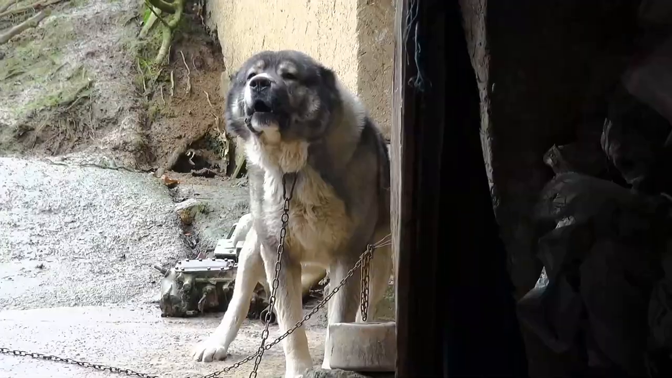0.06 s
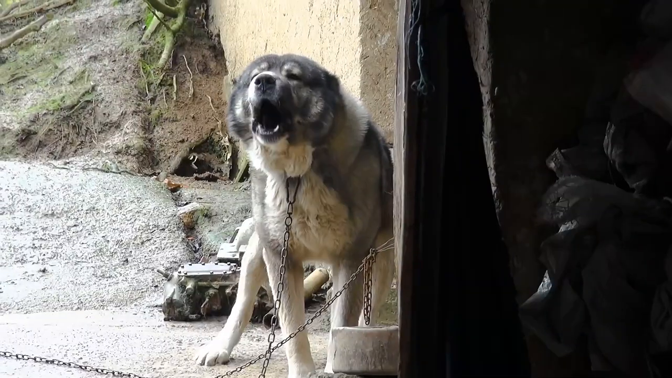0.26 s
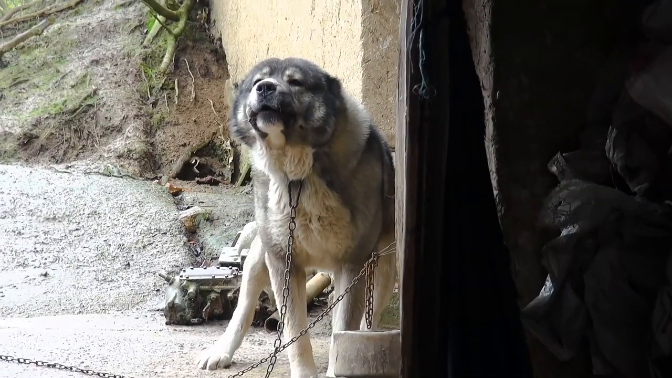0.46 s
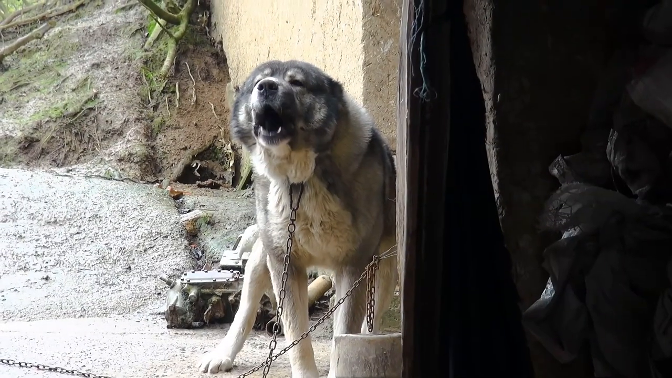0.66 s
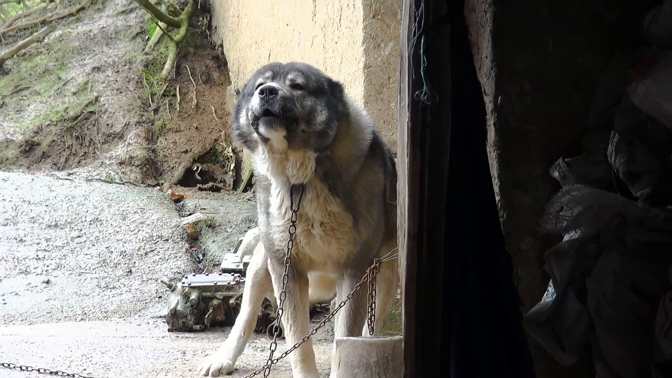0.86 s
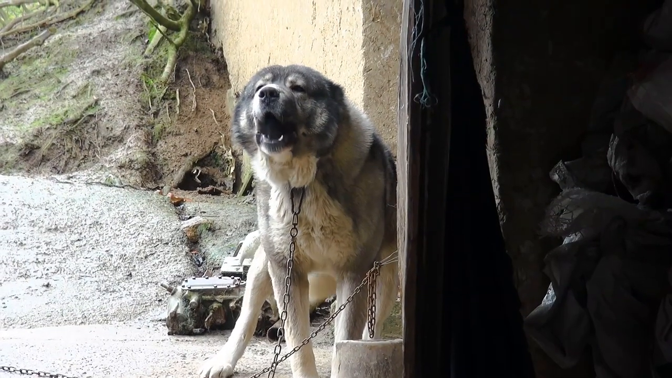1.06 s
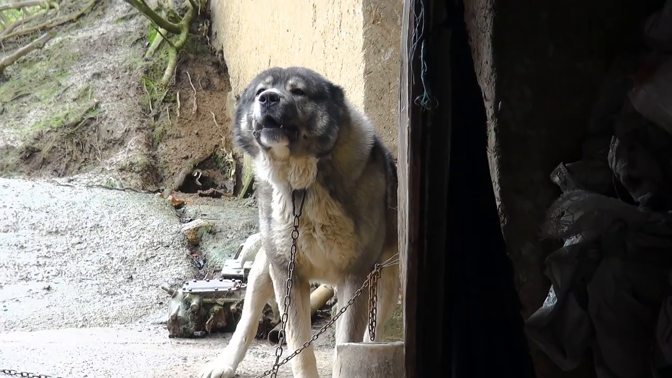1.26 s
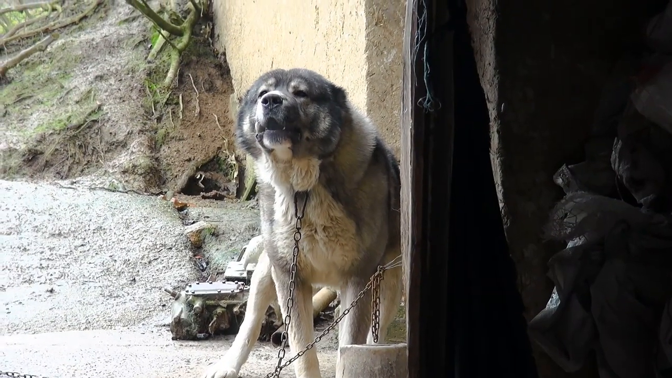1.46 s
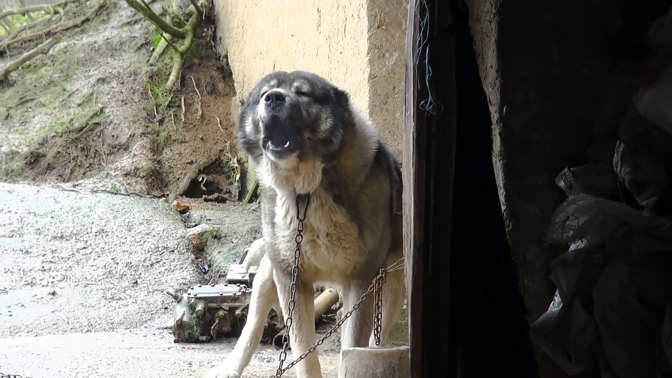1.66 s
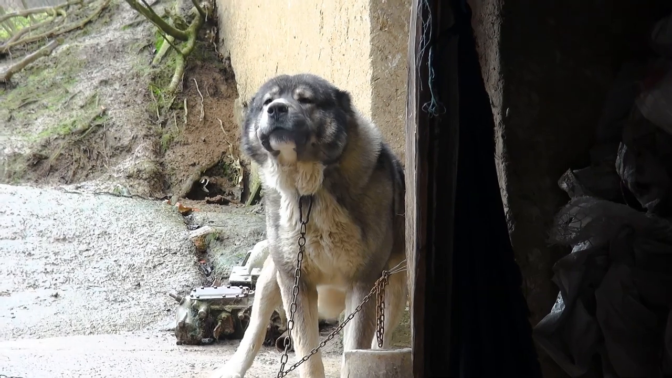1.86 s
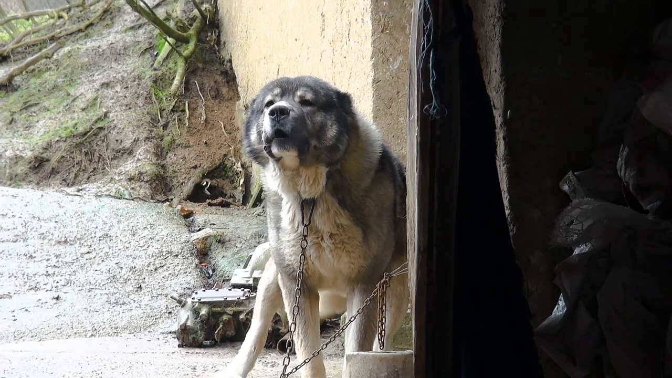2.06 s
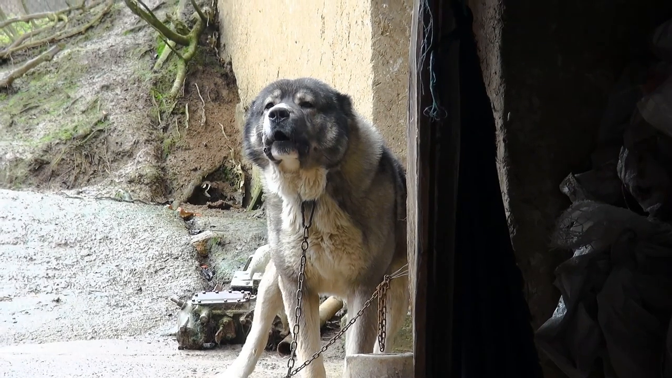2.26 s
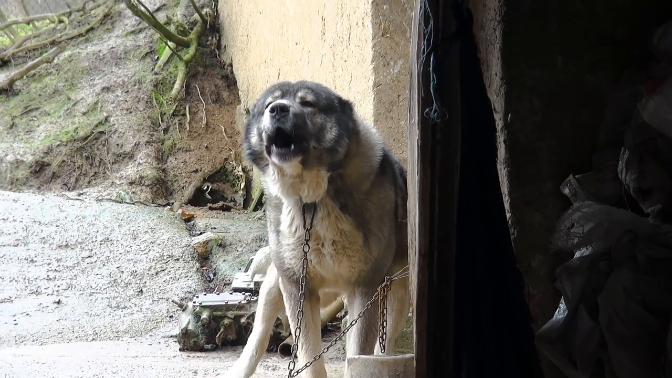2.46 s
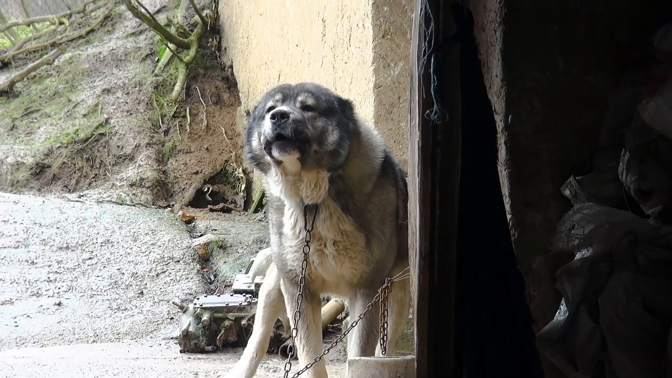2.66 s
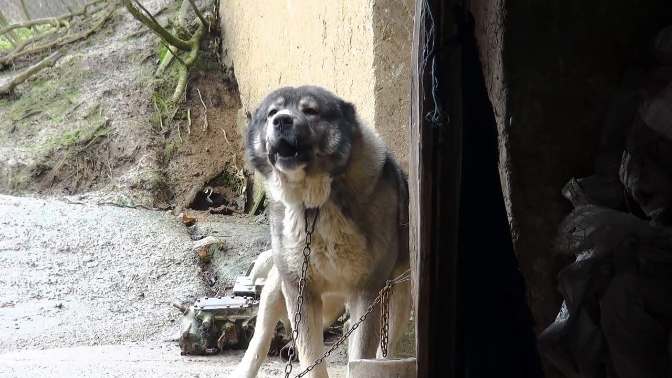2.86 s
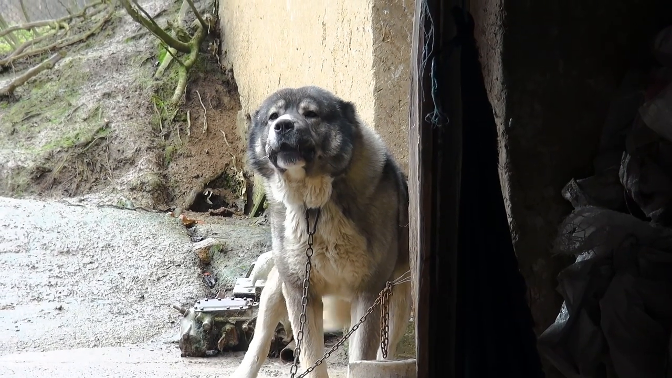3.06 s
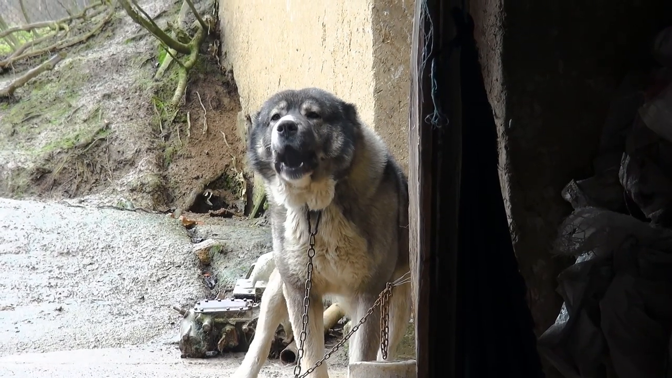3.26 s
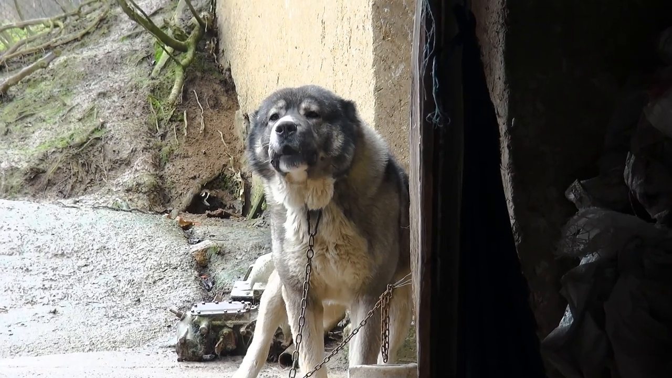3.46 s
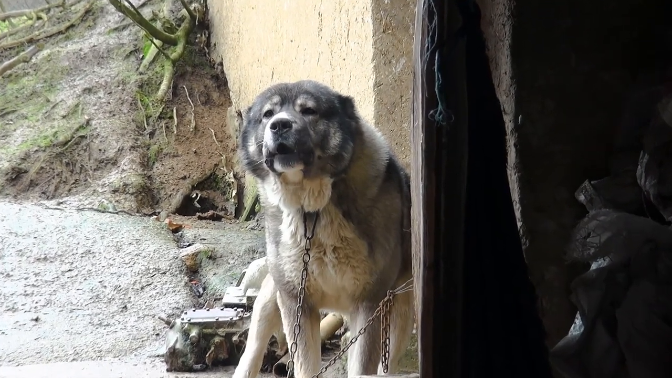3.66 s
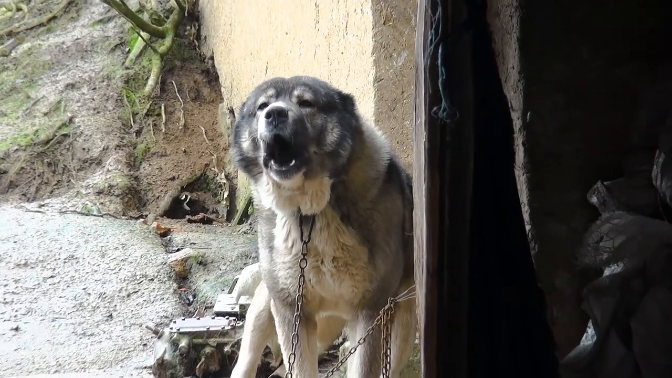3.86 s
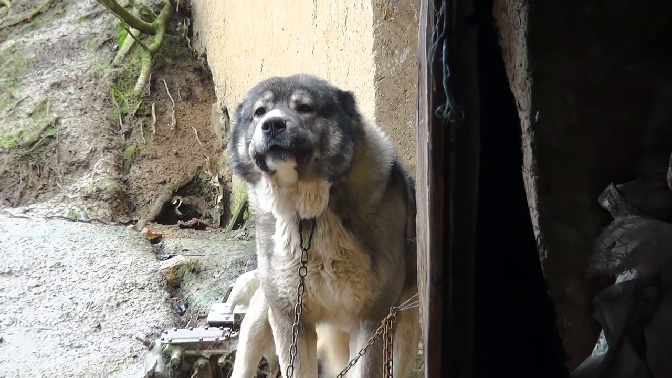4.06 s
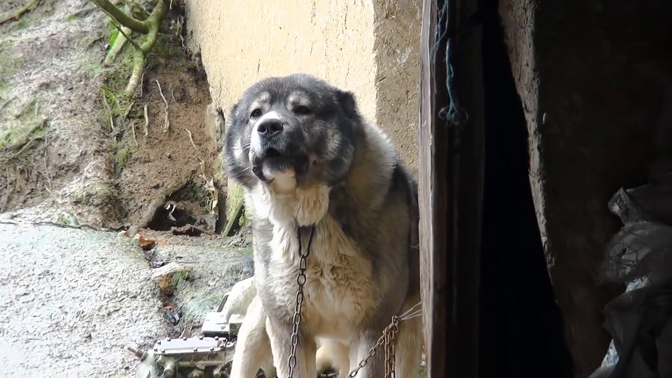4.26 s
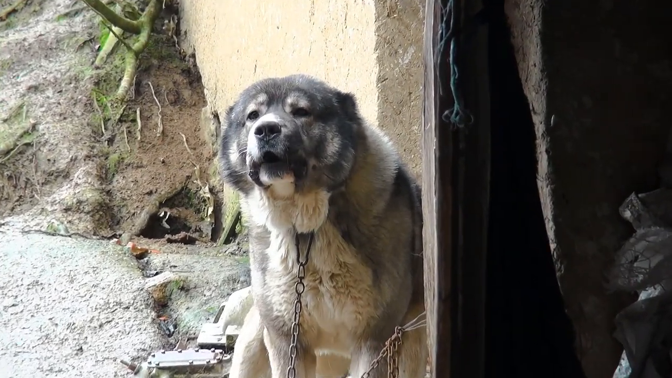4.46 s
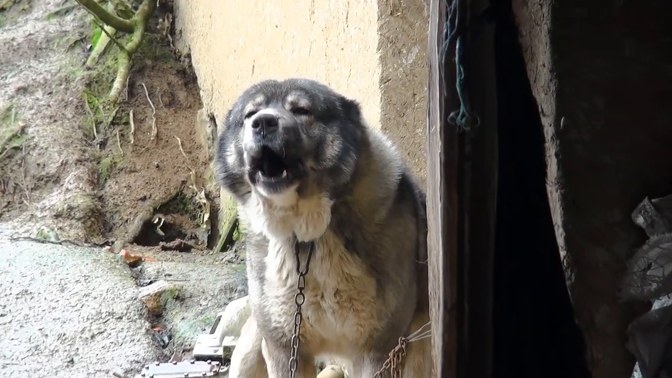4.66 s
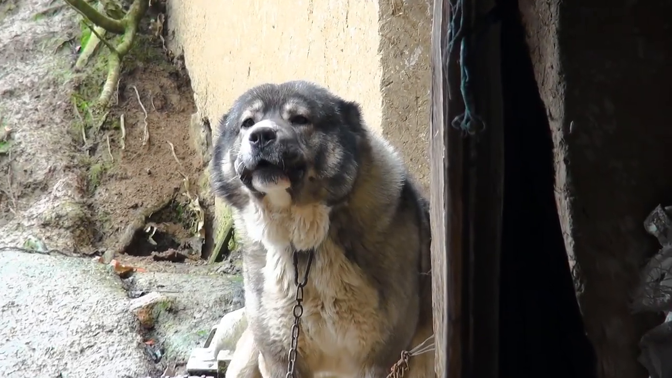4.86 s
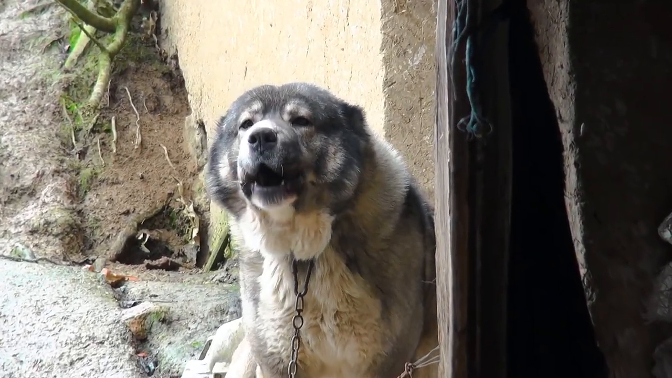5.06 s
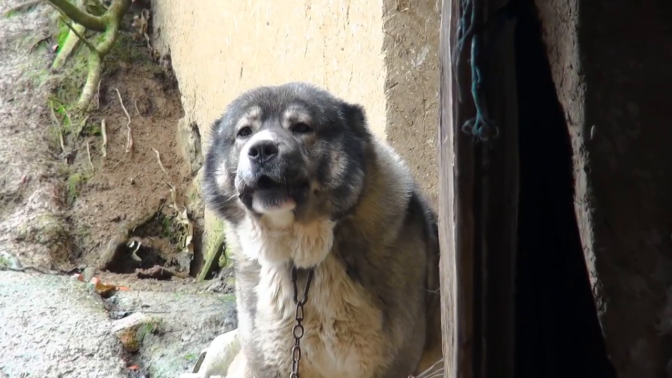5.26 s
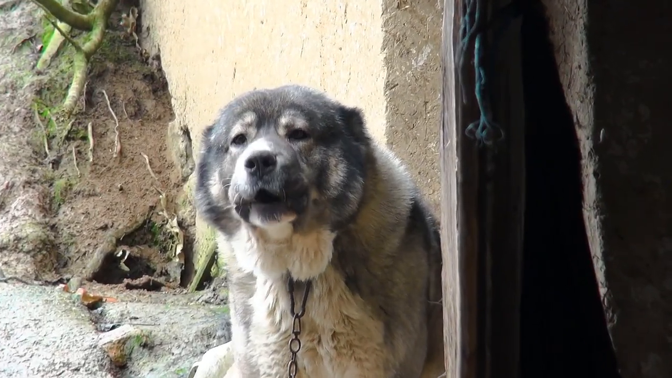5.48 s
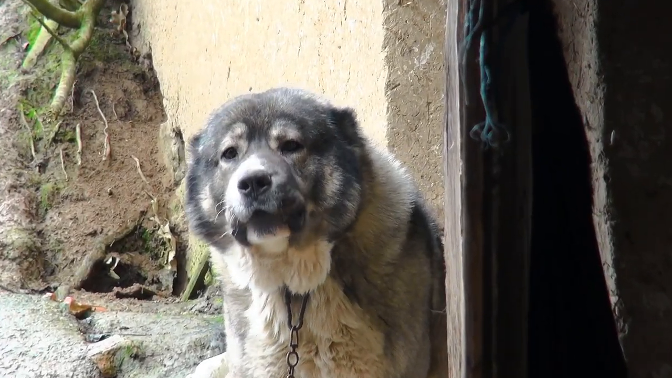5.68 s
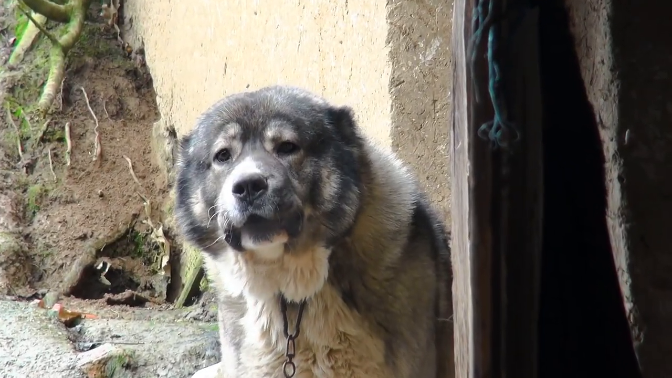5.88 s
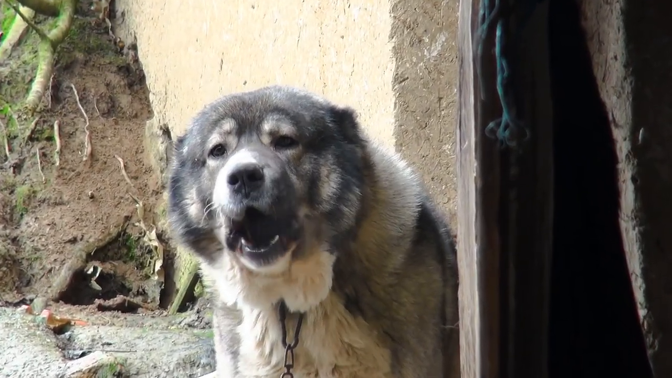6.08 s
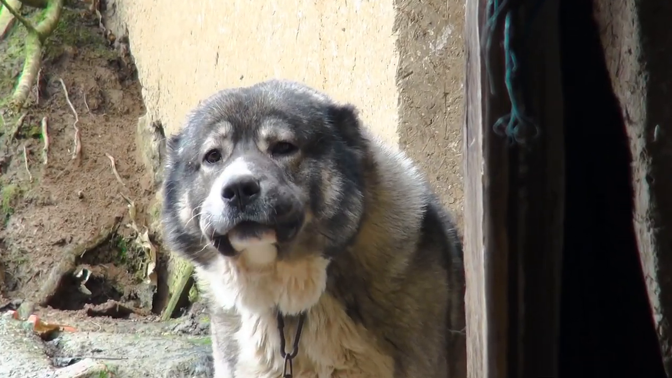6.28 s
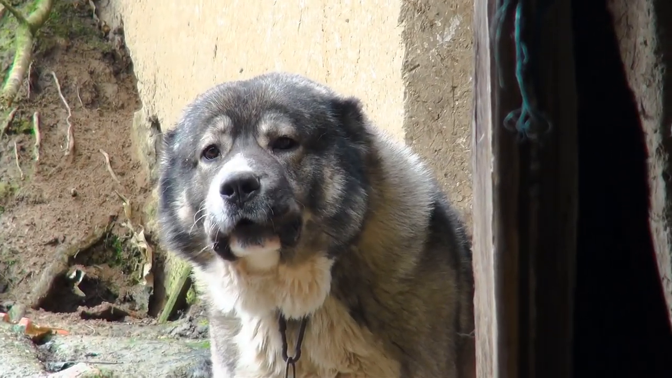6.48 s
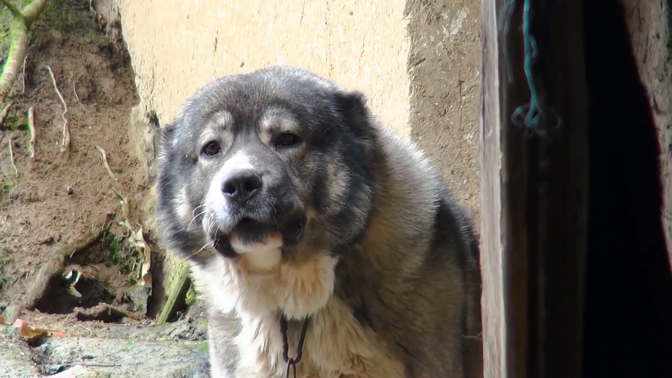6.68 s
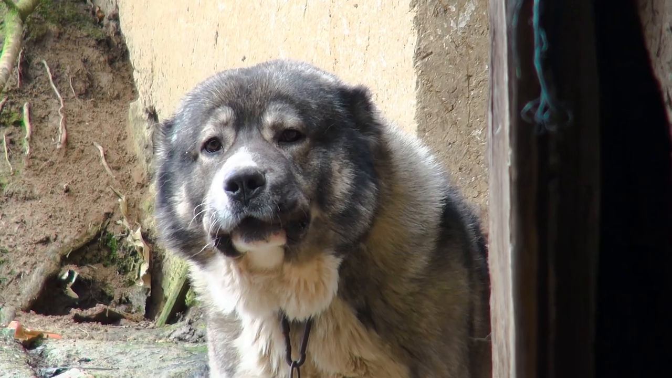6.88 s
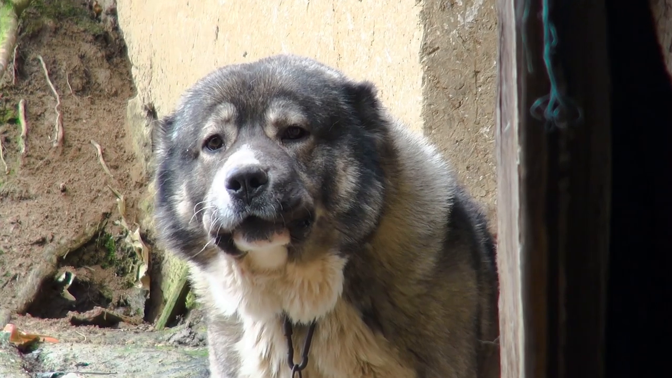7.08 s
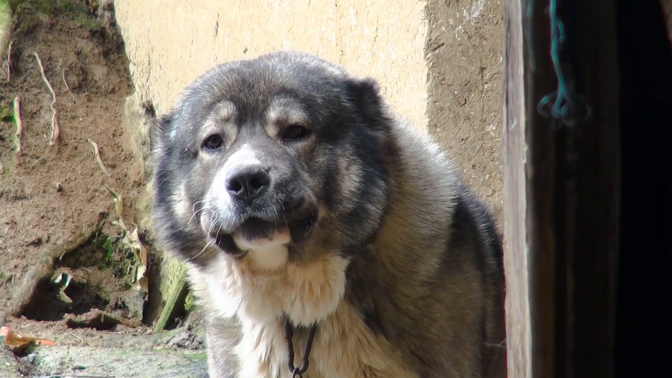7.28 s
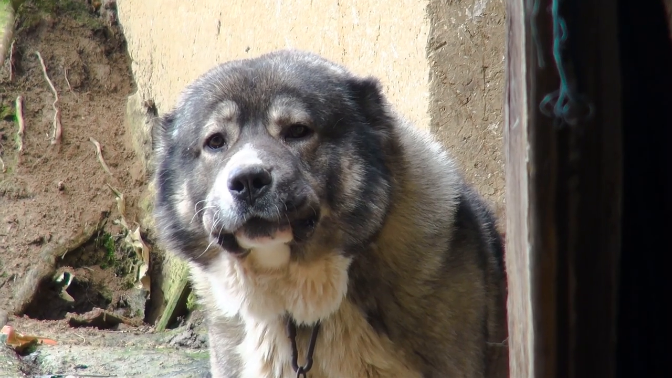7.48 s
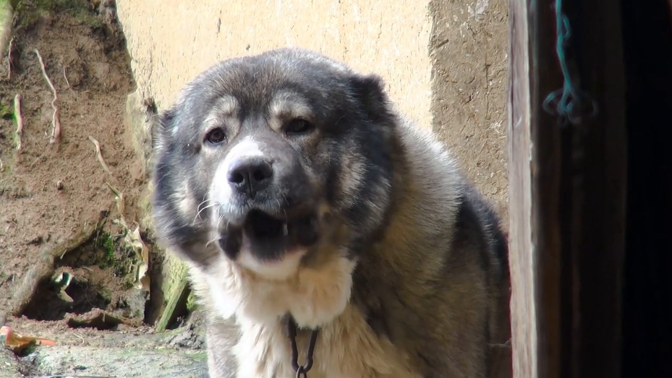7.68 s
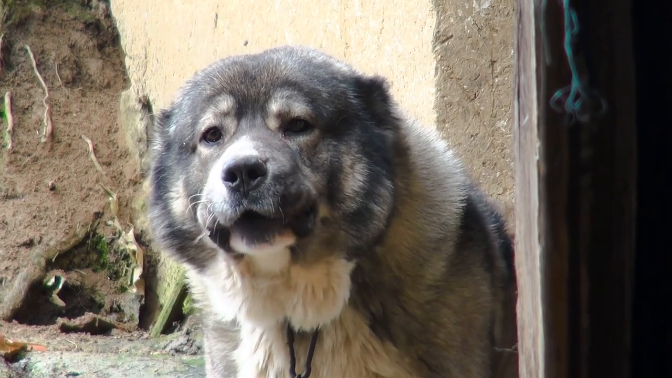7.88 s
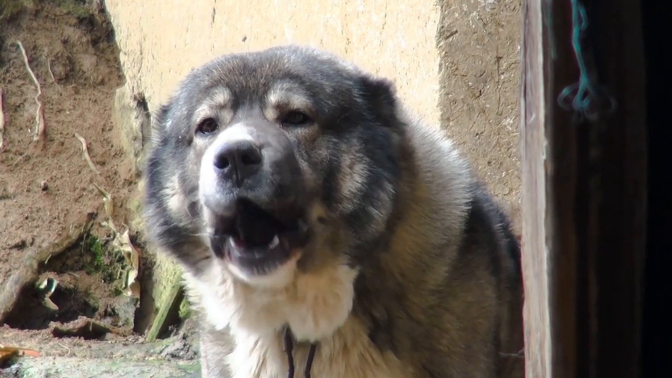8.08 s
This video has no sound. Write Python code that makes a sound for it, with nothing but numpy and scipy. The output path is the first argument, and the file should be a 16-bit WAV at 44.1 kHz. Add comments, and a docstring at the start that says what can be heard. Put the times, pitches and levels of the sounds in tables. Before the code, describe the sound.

The fading tail of a bark opens the scene, followed by a short breath. A big dog then barks loudly at about 0.3, 0.65 and 1.1 seconds, snores in with a flutter, and barks once at 1.7. The pattern repeats: three barks from 2.5 to 3.3, one at 3.9, three from 4.7 to 5.4, one at 6.15. Each bark is deep, hoarse and short, gliding up then dropping, with raspy breath on top. Low moans and small whines join many barks within the runs; rattling in-breaths fill pauses. From 7.0 to 7.7 a low, rough growl mixes with a snore, leading to two last barks at 7.75 and 8.1. Faint small birds chirp from 3.4 to 6 seconds and near 7. The shed adds short, boxy echoes over a soft yard hush; the close, loud barks sound compressed and slightly thudding.

```python
"""A big dog barks beside an open shed door, heard from inside: runs of three and one, then a last run of two.
Each bark is a pulsing voice that glides up and drops again, shaped by throat and mouth resonances.
The dog moans between barks and growls before the last run. Breath noise makes its snores, most with a flutter,
and the fading tail of a bark at the very start. Small birds chirp as gliding, buzzing tones over the yard's
hush of shaped noise. The shed adds echoes, and a limiter holds down the loud barks."""
import sys
import numpy as np
from scipy import signal
from scipy.fft import rfft, irfft
from scipy.io import wavfile
from scipy.ndimage import uniform_filter1d

SR = 44100
rng = np.random.default_rng(int(sys.argv[2]) if len(sys.argv) > 2 else 0)


def master(y):
    """Save y as 16-bit WAV."""
    cut = np.clip(np.atleast_2d(y).T, -1, 1)
    pcm = np.round(cut * 32767)  # scale
    wavfile.write(sys.argv[1], SR, pcm.astype(np.int16))


N = 358521
T = np.arange(N) / SR   # time in seconds

# Source levels in these tables are set before the shed and the limiter.
# Hush of the yard, relative loudness: pitch_hz, density_db (per Hz)
YARD_HUSH = [(25, -1.5), (60, -21.5), (130, -7.5), (300, -19.5), (430, -13.5), (1000, -23), (2500, -23.5),
             (4000, -21.5), (8000, -28.5), (15000, -31.5)]
# Bird notes, level before the mix with tree echoes: start_s, length_s, start_hz, end_hz, level_db, buzz_width_hz
BIRD_NOTES = [(3.396, 0.1, 4965, 4900, -60, 152), (3.612, 0.054, 4270, 4150, -57.5, 110),
              (3.64, 0.06, 3820, 3000, -50, 148), (4.162, 0.078, 3340, 3103, -47.5, 59.76),
              (4.408, 0.13, 5310, 5050, -50.5, 200.8), (4.936, 0.066, 5260, 5200, -48, 129),
              (5.196, 0.11, 3758, 3000, -55, 110.6), (5.717, 0.065, 4277, 4250, -47.5, 128),
              (5.731, 0.087, 3912, 3100, -48.5, 150), (5.98, .12, 5287, 5050, -48.5, 226.8),
              (7.042, 0.087, 3200, 3160, -61, 40.4)]
# How long echoes take to die by 60 dB in the shed: pitch_hz, decay_s
SHED_DECAY = [(150, 0.49), (300, 0.34), (700, 0.25), (1800, 0.21), (3000, 0.29), (5500, 0.25), (9000, 0.11)]
# Standing waves in the shed: pitch_hz, level_db, decay_s, left_minus_right_db
STANDING_WAVES = [(430, -54.5, 0.2, 12), (787.3, -49.5, 0.14, -1), (315.6, -57, 0.18, -3),
                  (925, -56.5, 0.14, -6.5)]
# Breathy sounds, level before the flutter: the first row is the fading tail of a bark before the start,
# the rest are snoring in-breaths: start_s, end_s, palate_flaps_per_s, start_db, end_db, flutter_depth (0-1)
BREATHY_SOUNDS = [(-.02, 0.067, 11, -28.5, -58, 0), (0.094, 0.258, 63, -44.5, -45, 0),
                  (1.4, 1.669, 22.5, -47.5, -49, 0.91), (2.077, 2.41, 30.6, -48, -45.5, 0.9),
                  (3.531, 3.852, 25.2, -48.5, -54.5, 0.72), (4.215, 4.615, 20, -51, -46, 0.9),
                  (5.902, 6.09, 23.7, -63.5, -66.5, 0.38), (7.201, 7.709, 30, -53, -54.5, 0.48)]
# Throat resonances of breath noise: pitch_hz, width_hz, level_db
BREATH_RESONANCES = [(298, 101, 1), (820, 57, 4), (1000, 310, -9.5), (1810, 38, 0.5), (2243, 37, -3.5),
                     (3200, 200, -26), (4860, 710, -22.5)]
# Path of the growl: time_s, pulses_per_s, level_db
GROWL_PATH = [(7.0, 117, -58), (7.057, 133, -42.5), (7.15, 139, -43.5), (7.3, 135, -50), (7.501, 132, -51),
              (7.6, 158, -54.5), (7.71, 128, -45.5)]
# Throat resonances while growling: pitch_hz, width_hz, level_db
GROWL_RESONANCES = [(136.9, 90, -10), (279.6, 64, 13), (428.6, 110, -29.5), (771, 236, -3), (1010, 180, -8),
                    (1452.6, 79, -6.5), (1780, 180, -7.5)]
# Nose resonances above the growl: pitch_hz, width_hz, level_db
NOSE_RESONANCES = [(2344, 80, -14), (3040, 62, -18), (4900, 410, -20.5), (8100, 460, -20)]
# Barks: wide_open_s, hold_s, top_pitch_hz, opening_db, top_db, late_db, roughness (0-1), rasp_db, upward_glide_s
BARKS = [(0.314, .110, 451, 5, 7.5, 2, 0.57, 1.5, .04), (0.648, 0.15, 458.6, -7, 4.5, -3, 0.57, -0.5, .03),
         (1.082, 0.087, 427, -10.5, -4.5, 4.5, 0.49, -2.5, .04),
         (1.736, .102, 443.7, -3, 8.5, 3, 0.36, 2, 0.041),
         (2.469, .127, 462.2, -1.5, 6.5, -1, 0.53, 1, .036),
         (2.835, 0.13, 447.9, -4, 3.5, -5.5, 0.34, 0, .03),
         (3.273, 0.087, 421.1, -4, -5.5, 1, 0.47, -2.5, 0.039),
         (3.918, 0.11, 432, -2, -1.5, 2.5, 0.56, 1.5, .034),
         (4.682, .122, 455.4, -3, 5, 2.5, 0.53, 0.5, .037),
         (5.038, 0.13, 440.2, -4, -1.5, -2, 0.36, -1, .034),
         (5.430, .090, 414.3, -1, -2.5, 2.5, 0.47, -3, .035),
         (6.146, .111, 433.7, -6, 4, -2.5, 0.54, 2, .034),
         (7.756, 0.14, 441.7, -9.5, -5, 0.5, 0.53, 1, .028),
         (8.088, .110, 429, -11, -11.5, 1, 0.3, 4, 0.031)]
# Moans joining one bark to the next: start_s, end_s, end_pitch_hz, start_db, end_db, whine_into_bark_db
MOANS = [(0.461, 0.605, 242.8, -43, -39, -31.5), (0.857, 1.001, 232.5, -40.5, -36.5, -26.5),
         (2.64, 2.781, 237.2, -37, -39.5, -30), (3.002, 3.187, 260.2, -39, -40, -25.5),
         (4.846, 4.972, 241.4, -38, -54.5, -27.5), (5.221, 5.372, 255.2, -44.5, -33.5, -28),
         (7.94, 8.037, 251.2, -37, -38.5, -24.5)]
# Throat and mouth resonances while barking: pitch_hz, width_hz, level_db
BARK_RESONANCES = [(397, 176, -2), (834.4, 345, 2.5), (997, 161.3, 6), (1446, 460, -6), (1831, 130, 1.5)]
# Upper resonances of the open mouth: pitch_hz, width_hz, level_db
MOUTH_RESONANCES = [(2283, 130, -19), (2956, 100, -50), (3600, 160, -41.5), (4240, 510, -31),
                    (5160, 470, -31), (6440, 570, -33), (8060, 2720, -44.5)]

AIR_DB = -61.5   # loudness of the hush
SHED_DB, SHED_UNLIKE = -2.0, 0.86   # echo gain; weight of the echoes that differ left and right
YARD_DB, YARD_DECAY_S, YARD_HZ = -70, 0.86, 1160   # faint far echoes from the slope
GROWL_ROUGH = 0.564   # roughness, 0-1
# Pitch arch shared by all barks
REST_HZ, OPEN_HZ, LATE_HZ, DROP_HZ, TAIL_HZ = 239.47, 406.6, 407.5, 287.7, 258.55
# The last part of the hold falls away; roughness on opening is a share of the roughness at the top
DROP_S, DROP_DB, DROP_ROUGH, OPEN_ROUGH = .037, -9, 0.707, 0.88
# A bark out of silence: start of its glide (dB against the opening), reached in ONSET_S
COLD_HZ, COLD_DB, ONSET_S, SILENT_DB, COLD_ROUGH = 295.1, -13, .019, -53.5, .4
# A whine leads out of a moan and breaks upward during the glide; BREAK_SHARE of the glide is left by then
WHINE_HZ, WHINE_ROUGH = 283.94, .12
BREAK_SHARE, BREAK_HZ, BREAK_DB, BREAK_ROUGH = .45, 329.15, 8.5, .25
MOAN_ROUGH, MOAN_END_ROUGH = .45, .22
TAIL_S, TAIL_DB, FADE_S = .03, -15, 0.064   # the end of a bark that no moan follows
SHUT_LEAK_DB, SHUT_LEAK_HZ = -16, 970   # low overtones that pass the closed lips
RASP_PATCHY_DB = 2.5   # each upper resonance swells and sinks on its own
CEILING_DB, RELEASE_DB_PER_S = -0.92, 150   # limiter
DIP_S, DIP_WIDTH_S = 0.082, 0.002   # the level dips briefly
CUTOFF_HZ = 15750   # the treble is fully cut from here up


def from_db(db):
    """Turn decibels into a gain."""
    return 10 ** (np.asarray(db) / 20)


def rms_one(x):
    """Scale a sound to an average strength (rms) of 1."""
    return x / np.sqrt(np.mean(x ** 2) + 1e-20)


def even(x, span_s):
    """Hold the running strength (rms) near 1."""
    return x / np.sqrt(uniform_filter1d(x ** 2, int(span_s * SR)) + 1e-9)


def at_hz(points, hz):
    """Read a table between its points, on a log-frequency axis."""
    table_hz, values = np.array(points).T
    return np.interp(np.log(hz), np.log(table_hz), values)


def filtered(x, order, hz, kind="low"):
    """Keep the low, high or middle (band) part of a sound."""
    return signal.sosfilt(signal.butter(order, hz, kind, fs=SR, output="sos"), x)


def drift(rate_hz):
    """Random wavering below the given rate, with an rms of 1."""
    return rms_one(filtered(rng.standard_normal(N), 2, rate_hz))


def throat(x, resonances):
    """Air cavities ring side by side, each at its own pitch, with alternating signs."""
    out = 0
    for k, (hz, width_hz, db) in enumerate(resonances):
        r = np.exp(-np.pi * width_hz / SR)   # a wider resonance dies sooner
        top = [(1 - r * r) / 2, 0, (r * r - 1) / 2]
        bottom = [1, -2 * r * np.cos(2 * np.pi * hz / SR), r * r]
        out = out + (-1) ** k * from_db(db) * signal.lfilter(top, bottom, x)
    return out


def folds(pitch, rough, count, jitter, shimmer_db, hiss_db, uneven, chest_db):
    """Vocal folds: wavering pulses in strong-weak pairs, hiss that swells each cycle, and a base tone."""
    phase = 2 * np.pi * np.cumsum(pitch * (1 + jitter * rough * drift(129.1))) / SR
    pairs = uneven * rough * np.cos(phase / 2)   # half the pitch: every other pulse is weaker
    pulses = sum(np.cos(k * phase) for k in range(2, count + 1)) / np.sqrt(count / 2)
    pulses = pulses * from_db(shimmer_db * rough * drift(210)) * (1 + pairs)
    density = np.sqrt(SR / 2 / (count * pitch))   # hiss as dense as the overtones that it lies among
    hiss = filtered(rng.standard_normal(N), 1, 500, "high")
    hiss = hiss * density * (1 + .5 * np.cos(phase))
    base = from_db(chest_db + 3.3 * rough * drift(40)) * np.cos(phase) * (1 + 0.37 * pairs)
    return base + np.sqrt(1 - rough) * pulses + from_db(hiss_db) * rough * hiss


def air():
    """The hush of the yard: shaped noise, partly alike in both channels."""
    white = rng.standard_normal((2, N))
    white = white[0] + 0.6 * white[1] * [[1], [-1]]
    shape = from_db(at_hz(YARD_HUSH, np.maximum(np.fft.rfftfreq(N, 1 / SR), 1)))
    return from_db(AIR_DB) * rms_one(irfft(rfft(white) * shape, N))


def shed(x):
    """Direct sound, then echoes that die band by band, standing waves and a faint long tail."""
    t = T[:SR]
    noise = rng.standard_normal((2, SR))
    noise = noise[0] + SHED_UNLIKE * noise[1] * [[1], [-1]]
    edges = 60 * 2.0 ** np.arange(0, 8.1, .5)   # half-octave bands
    echoes = 0
    for low, high in zip(edges, edges[1:]):
        decay_s = at_hz(SHED_DECAY, np.sqrt(low * high))
        band = filtered(noise, 2, [low, high], "band")
        equal_energy = np.sqrt(2 * np.log(1000) / decay_s / SR)   # a longer decay starts weaker
        echoes = echoes + band * from_db(-60 * t / decay_s) * equal_energy
    ringing = 0
    for hz, db, decay_s, pan_db in STANDING_WAVES:
        sides_db = pan_db * np.array([[.5], [-.5]])
        ringing = ringing + from_db(db - 60 * t / decay_s + sides_db) * np.sin(2 * np.pi * hz * t)
    far = filtered(rng.standard_normal((2, SR)), 2, YARD_HZ)
    far = far * from_db(YARD_DB - 60 * t / YARD_DECAY_S)
    response = from_db(SHED_DB) * echoes * np.clip(t / 0.0012, 0, 1) + ringing + far
    direct = x * from_db([[.5], [-.5]])   # 1 dB stronger on the left
    return direct + signal.fftconvolve(x[None], response, axes=1)[:, :N]


def birds():
    """Gliding sines, widened into a buzz by a fast warble and blurred by echoes among the trees."""
    out, warble = np.zeros(N), drift(150)
    for start, length, start_hz, end_hz, db, buzz_hz in BIRD_NOTES:
        along = np.clip((T - start) / length, 0, 1)
        pitch = start_hz + (end_hz - start_hz) * along + buzz_hz * warble
        swell = np.sin(np.pi * along ** 0.67)
        out += from_db(db) * swell * np.sin(2 * np.pi * np.cumsum(pitch) / SR)
    trees = rng.standard_normal(SR // 3) * from_db(-60 * T[:SR // 3] / 0.24)
    return .5 * out + from_db(-32.0) * signal.fftconvolve(out, trees)[:N]


def breathy_sounds():
    """Air hisses through the throat; in the snores a flapping soft palate chops it, twice a flap."""
    gain = np.zeros(N)
    for start, end, rate_hz, start_db, end_db, depth in BREATHY_SOUNDS:
        turn = ((T - start) * rate_hz) % 1   # place within one flap, 0-1
        first = np.exp(-turn / .3)
        second = .55 * (turn > .6) * np.exp(-(turn - .6) / .15)
        edge = np.clip(np.minimum(T - start, end - T) / 0.0075, 0, 1)   # soft start and end
        level = from_db(np.interp(T, [start, end], [start_db, end_db]))
        gain += edge * level * (1 - depth + 1.3 * depth * (first + second))   # depth 0: no flutter
    return gain * from_db(2.0 * drift(27)) * rms_one(throat(rng.standard_normal(N), BREATH_RESONANCES))


def growl():
    """Slow pulses with the mouth nearly shut; narrow nose resonances ring above."""
    s, *columns = np.transpose(GROWL_PATH)
    pitch, level_db = [np.interp(T, s, c) for c in columns]
    source = folds(pitch, GROWL_ROUGH, count=15, jitter=0.0851, shimmer_db=2.5, hiss_db=6.0, uneven=1.33,
                   chest_db=-6.5)
    voice = filtered(throat(source, GROWL_RESONANCES), 4, 2000)
    voice += filtered(throat(source, NOSE_RESONANCES), 4, 2100, "high")
    return (T > s[0]) * (T < s[-1]) * from_db(level_db) * even(voice, 0.054)


def voice_controls():
    """Every bark follows one pitch arch, entered cold or through a whine, left into a moan or silence."""
    points = []   # time_s, pitch_hz, level_db, roughness
    sounding = np.zeros(N, bool)
    for start, end, hz, start_db, end_db, _ in MOANS:
        points += [(start, REST_HZ, start_db, MOAN_ROUGH), (end, hz, end_db, MOAN_END_ROUGH)]
    for s, hold, top_hz, open_db, top_db, late_db, rough, _, glide in BARKS:
        end, drop_db = s + hold, late_db + DROP_DB
        # a moan this close before or after belongs to the bark
        before = [moan for moan in MOANS if 0 < s - moan[1] < .15]
        after = [moan for moan in MOANS if 0 < moan[0] - s - hold < .15]
        if before:
            begin, whine_db = before[0][0], before[0][5]
            points += [(s - glide, WHINE_HZ, whine_db, WHINE_ROUGH),
                       (s - BREAK_SHARE * glide, BREAK_HZ, whine_db + BREAK_DB, BREAK_ROUGH)]
        else:
            begin = s - glide - ONSET_S
            points += [(begin, REST_HZ, SILENT_DB, COLD_ROUGH),
                       (s - glide, COLD_HZ, open_db + COLD_DB, COLD_ROUGH)]
        points += [(s, OPEN_HZ, open_db, OPEN_ROUGH * rough),
                   (s + (hold - DROP_S) / 2, top_hz, top_db, rough),
                   (end - DROP_S, LATE_HZ, late_db, (rough + DROP_ROUGH) / 2),
                   (end, DROP_HZ, drop_db, DROP_ROUGH)]
        if not after:
            points += [(end + TAIL_S, TAIL_HZ, drop_db + TAIL_DB, DROP_ROUGH),
                       (end + FADE_S, REST_HZ, SILENT_DB, DROP_ROUGH)]
        sounding |= (T > begin) & (T < end + FADE_S)
    s, *columns = np.transpose(sorted(points))
    return [np.interp(T, s, c) for c in columns] + [sounding]


def bark_rasp(source):
    """Upper mouth resonances ring on top of the voice, each swelling and sinking on its own."""
    rasp = 0
    for k, resonance in enumerate(MOUTH_RESONANCES):
        rasp = rasp + (-1) ** k * from_db(RASP_PATCHY_DB * drift(12)) * throat(source, [resonance])
    rasp = filtered(rasp, 2, [2150, 14000], "band")
    times = np.ravel([(row[0], row[0] + row[1]) for row in BARKS])   # start and end of each hold
    levels_db = np.repeat([row[7] for row in BARKS], 2)
    return rasp * from_db(np.interp(T, times, levels_db))


def barks():
    """The mouth opens with effort: quiet moans are dull and breathy, barks are bright with a patchy rasp."""
    pitch, level_db, rough, sounding = voice_controls()
    source = folds(pitch, rough, count=14, jitter=0.0478, shimmer_db=2.0, hiss_db=3.3, uneven=0.84,
                   chest_db=-11.0)
    voice = filtered(throat(source, BARK_RESONANCES), 4, [215, 2000], "band")
    rasp = bark_rasp(source)
    dull = filtered(voice, 3, 330) + from_db(SHUT_LEAK_DB) * filtered(voice, 2, SHUT_LEAK_HZ)
    breath = from_db(-34.5) * rms_one(throat(rng.standard_normal(N), BREATH_RESONANCES))
    opening = np.clip((level_db + 33) / 24, .02, 1) ** 3.44   # louder means wider open
    swell = uniform_filter1d(opening, int(0.017 * SR), origin=int(0.0017 * SR))   # the rasp lags the voice
    mix = opening * (voice + swell * rasp) + (1 - opening) * (dull + breath)
    return sounding * from_db(level_db) * even(mix, 0.016)


def scene():
    """Dog and birds through the shed, over the hush."""
    return shed(barks() + breathy_sounds() + growl() + birds()) + air()


def record(dry):
    """A look-ahead limiter holds the barks down, lopsided overload adds a thud, the top is cut."""
    level_db = 20 * np.log10(np.abs(dry).max(0) + 1e-9)
    release = RELEASE_DB_PER_S * T
    held = np.maximum.accumulate(level_db + release) - release   # jumps up at once, sinks steadily
    # averaging over the next 2 ms starts the cut ahead of each peak
    cut_db = uniform_filter1d(np.maximum(held - CEILING_DB, 0), 88, origin=-43)
    x = dry * from_db(-cut_db)
    x = x + 0.11 * filtered(x ** 2, 2, 170)   # the thud follows each bark's envelope
    x = x * (1 - 1.1 * np.exp(-((T - DIP_S) / DIP_WIDTH_S) ** 2))
    x = filtered(x, 2, 30, "high")
    return signal.sosfilt(signal.cheby2(12, 70, CUTOFF_HZ, fs=SR, output="sos"), x)


dry = scene()
out = record(dry)
master(out)
```